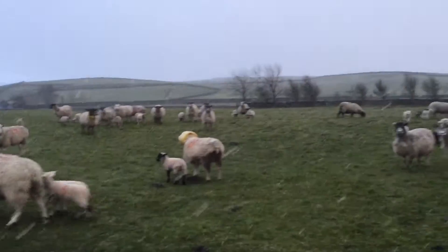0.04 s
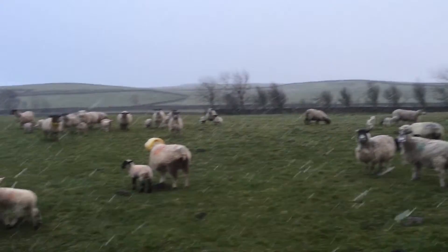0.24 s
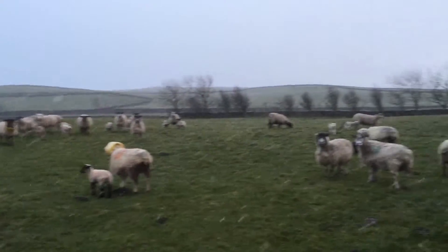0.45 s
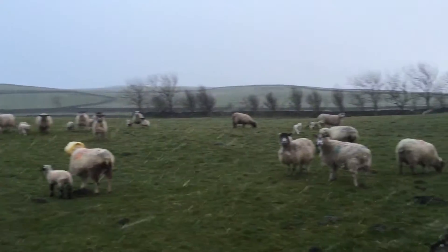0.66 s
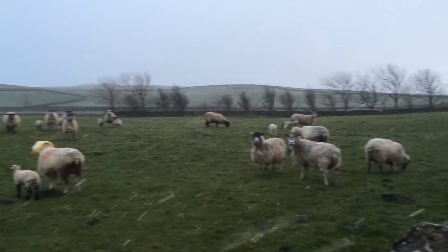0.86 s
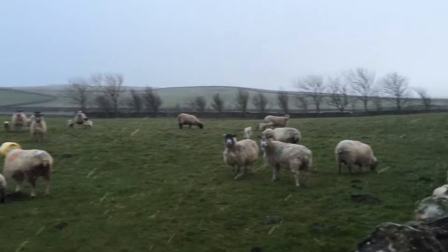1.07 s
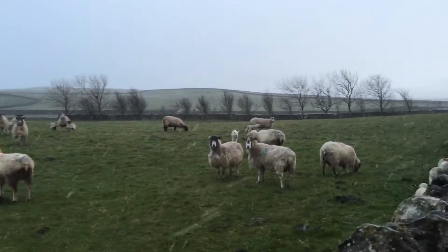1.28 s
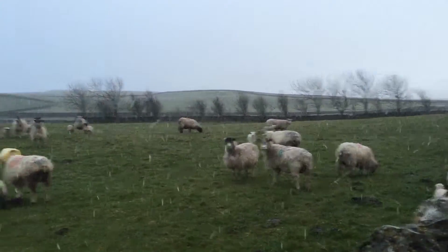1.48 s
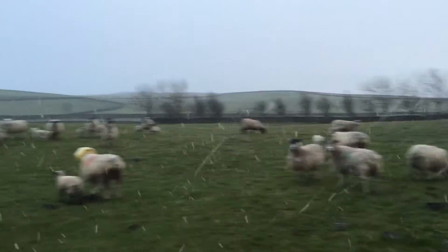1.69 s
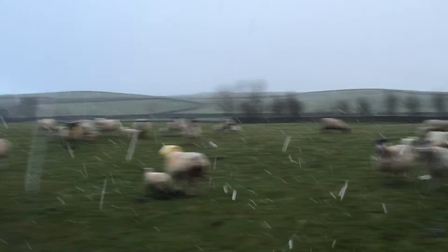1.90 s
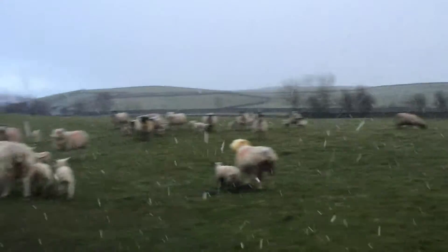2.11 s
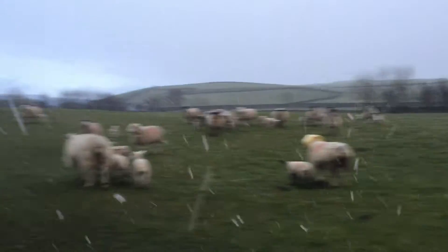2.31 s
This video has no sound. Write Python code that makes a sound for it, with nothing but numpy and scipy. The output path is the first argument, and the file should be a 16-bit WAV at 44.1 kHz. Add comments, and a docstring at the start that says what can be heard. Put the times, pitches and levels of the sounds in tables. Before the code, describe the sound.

A sheep close by gives one long bleat, opening at 0.3 seconds on a thin squeal. It breaks into a rasp, quavers hard from 0.6 to 0.9 seconds, then clears to a sagging buzz that ends in a croak at 1.7. Distant sheep answer faintly around 2 seconds. Throughout, wind rumbles and thumps on the microphone and sleet hisses softly on the grass.

```python
"""A sheep close by gives one long bleat in a sleety hillside field.
Pulses from its vocal folds ring through its throat and mouth. The bleat opens on a thin squeal,
breaks into a rasp that quavers in hard surges, then clears to a buzzing note that sags and ends
in a croak. Other sheep answer far off. Wind buffets the microphone, and sleet hisses on the grass."""
import sys
import numpy as np
from scipy import signal
from scipy.fft import rfft, irfft
from scipy.io import wavfile
from scipy.ndimage import uniform_filter1d

SR = 44100
rng = np.random.default_rng(int(sys.argv[2]) if len(sys.argv) > 2 else 0)


def transcribe(u):
    """Save the signal u as a 16-bit wav file named by the first command-line argument.

    u: samples, shape (n,) or (channels, n), limited to [-1, 1]; the rate is SR.
    q: integer samples, one column per channel.
    """
    v = np.clip(np.atleast_2d(u).T, -1, 1)
    q = np.round(v * 32767).astype(np.int16)
    wavfile.write(sys.argv[1], SR, q)


N = 108045
T = np.arange(N) / SR

# The sagging pitch of the main voice: time_s, pitch_hz
VOICE_PITCH = [(.655, 171.5), (.675, 161), (.72, 162), (.755, 170), (1.052, 171.2), (1.212, 168.8),
               (1.31, 165.5), (1.448, 165.3), (1.534, 158), (1.602, 157.1), (1.652, 149.6), (1.675, 141),
               (1.7, 122)]
# The hard pushes that make the bleat quaver: time_s, lift_db, boom_level_db
SURGES = [(0.635, 9, -31), (0.7, 10, -22.5), (0.762, 7, -17), (0.847, 3.5, -29.5), (0.92, 7.5, -45)]


def from_db(db):
    """Turn decibels into a number to multiply a sound by."""
    return 10 ** (np.asarray(db) / 20)


def rms_one(x):
    """Scale a sound so that its average level is one."""
    return x / np.sqrt(np.mean(x ** 2) + 1e-20)


def evened(x):
    """Hold the level steady over a few cycles."""
    return x / np.sqrt(uniform_filter1d(x ** 2, size=1100) + 1e-9)


def curve(rows):
    """Join a table's points with straight lines: its second column at every sample."""
    times, values, *_ = np.transpose(rows)
    return np.interp(T, times, values)


def fader(rows):
    """Volume from a table's last column, in decibels; silent before and after its times."""
    rows = np.array(rows)
    return from_db(np.interp(T, rows[:, 0], rows[:, -1], left=-200, right=-200))


def coloured(x, tone):
    """Make some frequencies stronger and others weaker, as the table says; the level comes out at one."""
    size = 8192
    hz, db = np.transpose(tone)
    grid_hz = np.maximum(np.arange(size // 2 + 1) * SR / size, 1)
    gains = from_db(np.interp(np.log(grid_hz), np.log(hz), db))
    # Build a filter that rings after each pulse, never before it (minimum phase).
    cepstrum = irfft(np.log(gains))
    cepstrum[1:size // 2] *= 2
    cepstrum[size // 2 + 1:] = 0
    ring = irfft(np.exp(rfft(cepstrum)))
    return rms_one(signal.fftconvolve(x, ring)[:N])


def wind():
    """Swirls of air hit the microphone as short, low thumps over a rumble."""
    # How loud the rumble is: time_s, level_db
    rumble_level = [(0, -43), (.57, -40.5), (.63, -56), (.76, -51), (.86, -37), (1.45, -36), (1.93, -51.5),
                    (2.1, -42), (2.45, -42.5)]
    # The rumble's deep tone: frequency_hz, gain_db
    rumble_tone = [(20, -58), (45, -15), (70, 2), (110, -6.5), (180, -9), (300, -28.5), (1500, -81)]
    # Thumps of wind: peak_s, level_db, half_length_s, top_hz
    thumps = [(0.112, -32.5, 0.014, 114), (0.248, -25, 0.019, 153), (0.336, -29, 0.022, 123),
              (0.482, -19.5, 0.01, 230), (0.567, -29, 0.011, 141), (0.781, -25, 0.0041, 181),
              (0.948, -27, 0.013, 228), (1.067, -19, 0.0051, 147), (1.197, -20, 0.01, 202),
              (1.257, -32, 0.023, 184), (1.391, -21.5, 0.012, 96), (1.445, -30.5, 0.034, 222),
              (1.498, -30.5, 0.014, 148), (1.61, -35, 0.017, 108), (1.836, -35.5, 0.01, 216.6),
              (2.008, -36.5, 0.013, 90.4), (2.191, -30.5, 0.011, 190), (2.246, -29.5, 0.016, 109)]
    bottom_hz = 49.7
    out = from_db(curve(rumble_level)) * coloured(rng.standard_normal(N), rumble_tone)
    for peak_s, level_db, half_length_s, top_hz in thumps:
        swell = np.exp(-((T - peak_s) / half_length_s) ** 2 / 2)
        band = signal.butter(3, [bottom_hz, top_hz], "band", fs=SR, output="sos")
        swirl = swell * signal.sosfilt(band, rng.standard_normal(N))
        out += from_db(level_db) * swirl * np.linalg.norm(swell) / np.linalg.norm(swirl)
    return out


def sleet():
    """Sleet lands on the grass as a fine hiss."""
    # How loud the sleet is: time_s, level_db
    level = [(0, -55.5), (.25, -47.5), (1.5, -48.5), (1.8, -52.5), (2.15, -53.5), (2.45, -63.5)]
    # The tone of the hiss: frequency_hz, gain_db
    tone = [(200, 4), (600, -13), (1500, -1), (2200, -5.5), (3100, -4), (4200, -7.5), (5000, -14),
            (8000, -30), (16000, -29)]
    return from_db(curve(level)) * coloured(rng.standard_normal(N), tone)


def field_rush():
    """Far-off wind rushes steadily over the open field."""
    # The tone of the rush: frequency_hz, gain_db
    tone = [(100, 0.5), (600, 4), (820, -3.5), (940, 10), (1060, 1.5), (1700, 3.5), (2300, -16),
            (16000, -30)]
    return from_db(-52) * coloured(rng.standard_normal(N), tone)


def vocal_folds(pitch_hz, jitter, shimmer_db, air):
    """One pulse and puff of air a cycle, uneven in timing (jitter, in cycles) and strength (shimmer)."""
    phase = np.cumsum(pitch_hz) / SR
    chance = rng.standard_normal((1200, 2))
    cycles = np.arange(1, int(phase[-1]))
    slip = np.interp(cycles, phase, jitter * np.ones(N)) * chance[cycles, 0]
    position = np.interp(cycles + slip, phase, np.arange(N))
    strength = from_db(shimmer_db * chance[cycles, 1])
    pulses = np.zeros(N)
    for step in range(-5, 7):  # a pulse falls between samples, so spread it over its neighbours
        sample = position.astype(int) + step
        gap = sample - position
        np.add.at(pulses, np.clip(sample, 0, N - 1), strength * np.sinc(gap) * np.sinc(gap / 6))
    puff_sharpness = 0.14
    puffs = rng.standard_normal(N) * np.exp(puff_sharpness * np.cos(2 * np.pi * phase))
    air = np.clip(air, 0, 1)
    return np.sqrt(1 - air ** 2) * rms_one(pulses) + air * rms_one(puffs)


def squeal():
    """Clean, high pulses ring in the throat as the thin squeal that opens the bleat."""
    # The squeal's rising pitch: time_s, pitch_hz
    pitch = [(.29, 292), (.316, 331), (.328, 337), (.339, 324), (.353, 323), (.37, 335), (.386, 330),
             (.456, 340), (.496, 338), (.542, 346), (.566, 336), (.59, 340), (.632, 335), (.7, 350),
             (.76, 362)]
    # How loud the squeal is: time_s, level_db
    level = [(.28, -58), (.302, -33), (.322, -28), (.345, -30.5), (.55, -30), (.67, -30.5), (.8, -45)]
    # The throat's high ringing: frequency_hz, gain_db
    tone = [(330, -11), (660, -7.5), (850, -14.5), (2300, -8), (2680, 5.5), (3300, -2.5), (3700, 4.5),
            (4500, -9.5), (5050, -21.5), (6800, -20.5), (9300, -23), (10500, -47), (13000, -32),
            (16000, -45)]
    pulses = vocal_folds(curve(pitch), jitter=.0018, shimmer_db=.7, air=.1)
    return fader(level) * coloured(pulses, tone)


def rasp():
    """A second, ragged vibration, mostly a little above the main voice, beats against it."""
    # The course of the rasp: time_s, pitch_hz, level_db
    course = [(.36, 152, -56), (.405, 165.3, -35), (.45, 180.2, -26.5), (.52, 186, -27),
              (.76, 187.8, -29.5), (.9, 186.4, -31), (1.08, 180.9, -27.5), (1.25, 176.3, -32.5),
              (1.4, 172, -35.5), (1.5, 163.8, -43)]
    # How uneven the pulse timing is: time_s, jitter_cycles
    jitter = [(.42, .012), (.5, .03), (1.05, .02), (1.4, .012)]
    # The tone of the open mouth: frequency_hz, gain_db
    tone = [(200, -45), (400, -11), (550, 1), (720, -17), (870, -10), (1130, 7.5), (1340, 13.5), (1600, -2),
            (1830, 9), (2150, -8), (2700, -38), (3500, -27), (3980, -11), (4900, -38), (8500, -34),
            (15000, -78)]
    wander = rms_one(uniform_filter1d(rng.standard_normal(N), size=700))
    pitch_hz = curve(course) * (1 + .012 * wander)
    pulses = vocal_folds(pitch_hz, curve(jitter), shimmer_db=2.0, air=.22)
    return fader(course) * evened(coloured(pulses, tone))


def roar(surge_db):
    """At full effort, rushing air mixes with harsh, uneven pulses and swells with each surge."""
    # How loud the roar is before the surges lift it: time_s, level_db
    level = [(.4, -37.5), (.48, -32), (.63, -32), (.78, -27.5), (.81, -30), (.93, -32), (.98, -35.5),
             (1.3, -51.5)]
    # The roar's harsh tone: frequency_hz, gain_db
    tone = [(200, -26.5), (510, 4.5), (800, -16), (1500, -2), (1950, -9), (2380, -0.5), (2620, -7.5),
            (2850, 0), (3150, -7.5), (4100, -12), (4900, -19), (6500, -27.5), (9700, -29), (10800, -38),
            (16000, -44)]
    pulses = vocal_folds(curve(VOICE_PITCH), jitter=.03, shimmer_db=2.0, air=.8)
    return fader(level) * from_db(surge_db) * evened(coloured(pulses, tone))


def mouth(x):
    """The mouth rings at a high frequency that glides as the jaw moves."""
    # Where the mouth rings: time_s, frequency_hz
    glide = [(1.05, 2440), (1.35, 2517), (1.54, 2450), (1.68, 2550)]
    centre_hz, width_hz = curve(glide), 161
    decay = np.exp(-np.pi * width_hz / SR)
    out, state = np.zeros(N), np.zeros(2)
    for block in np.array_split(np.arange(N), N // 128):
        feedback = [1, -2 * decay * np.cos(2 * np.pi * centre_hz[block[0]] / SR), decay * decay]
        out[block], state = signal.lfilter([1], feedback, x[block], zi=state)
    return out


def voice(surge_db):
    """The main note booms in the throat on each surge, clears as it sags, and ends in a croak."""
    # How loud the note is before the surges lift it: time_s, level_db
    level = [(.585, -53), (.625, -28.5), (.72, -36.5), (.85, -40), (1.0, -31), (1.48, -30), (1.64, -32),
             (1.69, -31), (1.73, -46)]
    # How uneven the pulse timing is: time_s, jitter_cycles
    unevenness = [(.8, .006), (.97, .0015), (1.63, .001), (1.675, .04)]
    # The tone of the throat and half-closed mouth: frequency_hz, gain_db
    tone = [(160, -16), (312, -4), (340, -9), (450, 1), (510, 2), (640, -5), (780, -23), (1100, -22),
            (1300, -10.5), (1470, -21), (2030, -12), (2220, -21), (3400, -33), (4550, -13), (5000, -42),
            (6600, -26), (7500, -44), (15000, -54)]
    # The throat's lowest ringing: frequency_hz, gain_db
    boom_tone = [(340, -19.5), (500, 5.5), (680, -17.5), (1100, -48), (1400, -14), (1530, 3), (1700, -20),
                 (4000, -69)]
    surge_share, boom_lag_s, boom_width_s = 0.69, 0.0065, 0.0093
    jitter = curve(unevenness)
    pulses = vocal_folds(curve(VOICE_PITCH), jitter, shimmer_db=.4, air=16 * jitter)
    buzz = evened(mouth(coloured(pulses, tone)))
    note = fader(level) * from_db(surge_share * surge_db) * buzz
    boom_gain = sum(from_db(boom_db) * np.exp(-((T - time_s - boom_lag_s) / boom_width_s) ** 2 / 2)
                    for time_s, _, boom_db in SURGES)
    return note + boom_gain * evened(coloured(pulses, boom_tone))


def hillside_echo(x):
    """The ground and the stone walls scatter a faint echo back."""
    level_db, fade_s = -21, .25
    tail = rng.standard_normal(SR // 2) * from_db(-60 * T[:SR // 2] / fade_s)
    return from_db(level_db) * signal.fftconvolve(x, tail / np.linalg.norm(tail))[:N]


def far_sheep():
    """Faint, quavering answers cross the field, each rising and falling in pitch."""
    # Distant bleats: peak_s, half_length_s, pitch_hz, mouth_hz, level_db
    answers = [(1.92, .11, 325, 2650, -52.5), (1.99, .045, 197, 1550, -51), (2.15, .05, 240, 1850, -55)]
    quaver_hz, quaver_db, pitch_arch = 13, 2, .05
    out = np.zeros(N)
    for peak_s, half_length_s, pitch_hz, mouth_hz, level_db in answers:
        swell = np.exp(-((T - peak_s) / half_length_s) ** 2 / 2)
        quaver = np.cos(2 * np.pi * quaver_hz * (T - peak_s))
        arching_hz = pitch_hz * (1 + pitch_arch * (swell - 1))
        pulses = vocal_folds(arching_hz, jitter=.015, shimmer_db=2.0, air=.22)
        mouth_band = signal.butter(2, [mouth_hz / 1.25, mouth_hz * 1.25], "band", fs=SR, output="sos")
        call = rms_one(signal.sosfilt(mouth_band, pulses))
        out += from_db(level_db + quaver_db * quaver) * swell * call
    return out


def scene():
    """The close bleat, its echo and the far answers, in wind and sleet."""
    surge_width_s, chest_low_hz = 0.022, 166
    surge_db = sum(lift_db * np.exp(-((T - time_s) / surge_width_s) ** 2)
                   for time_s, lift_db, _ in SURGES)
    bleat = squeal() + voice(surge_db) + rasp() + roar(surge_db)
    bass_cut = signal.butter(2, chest_low_hz, "high", fs=SR, output="sos")
    bleat = signal.sosfilt(bass_cut, bleat)
    return (bleat + hillside_echo(bleat) + far_sheep() + wind() + sleet() + field_rush())[None]


def record(dry):
    """Cut away the very highest treble."""
    cutoff_hz = 15900
    return signal.sosfilt(signal.ellip(10, .2, 80, cutoff_hz, fs=SR, output="sos"), dry)


dry = scene()
out = record(dry)
transcribe(out)
```